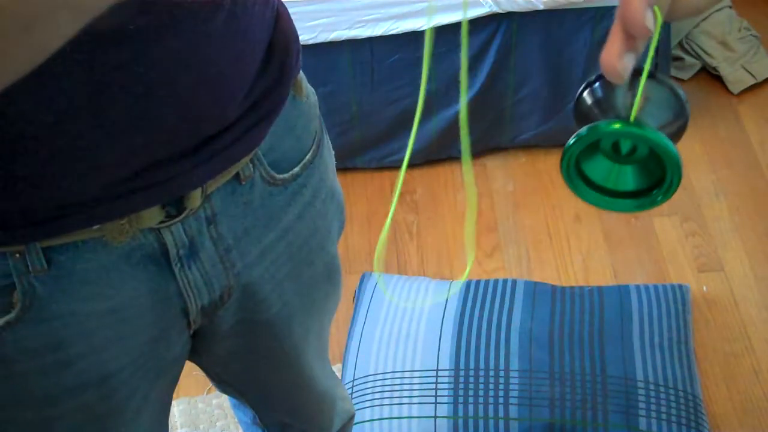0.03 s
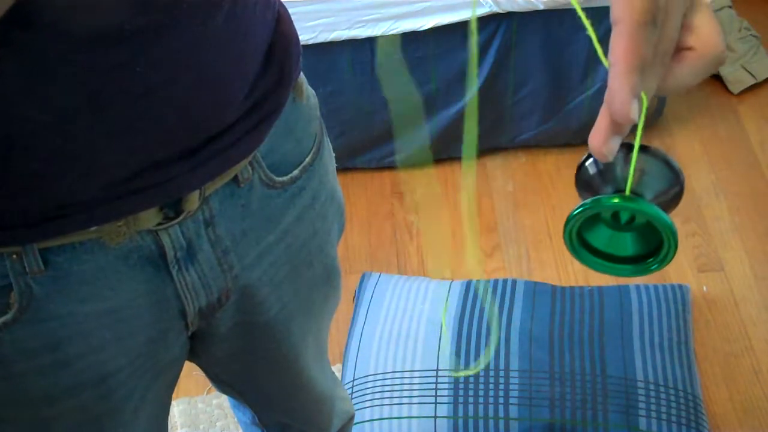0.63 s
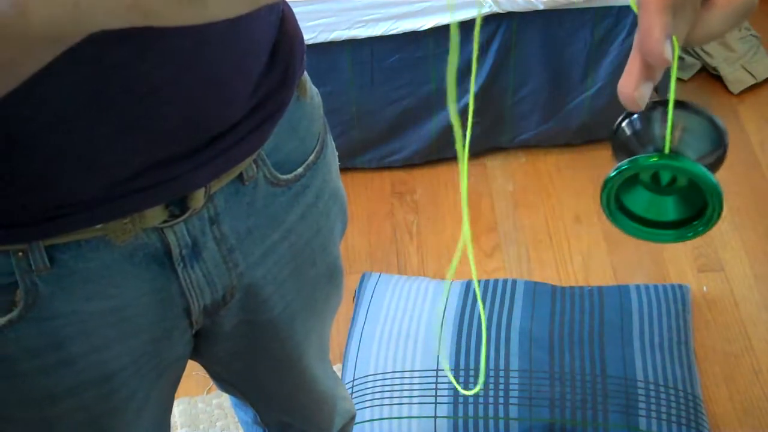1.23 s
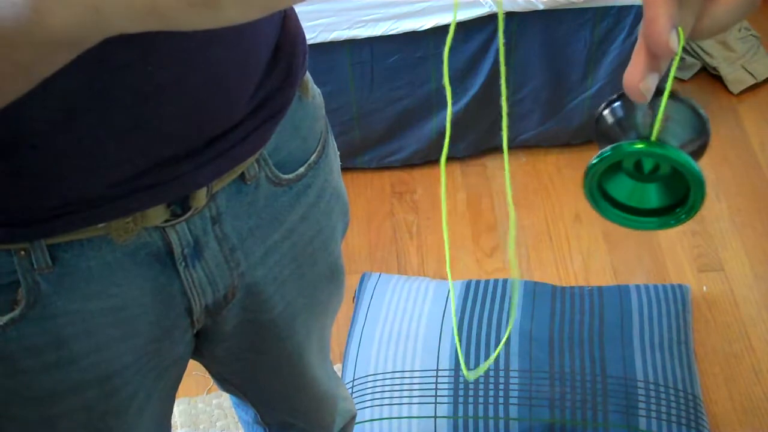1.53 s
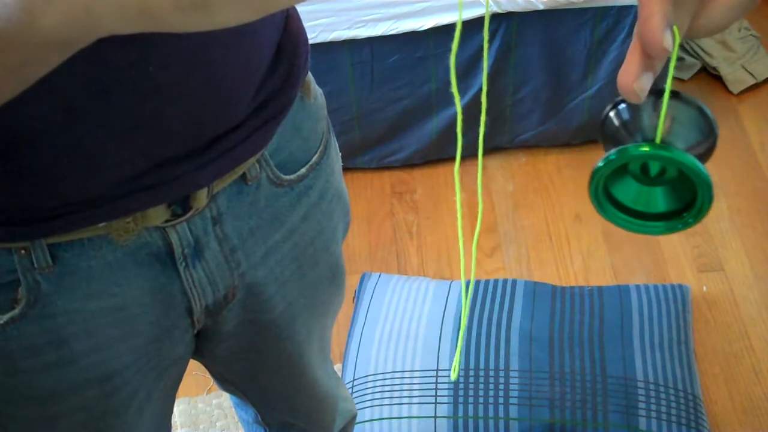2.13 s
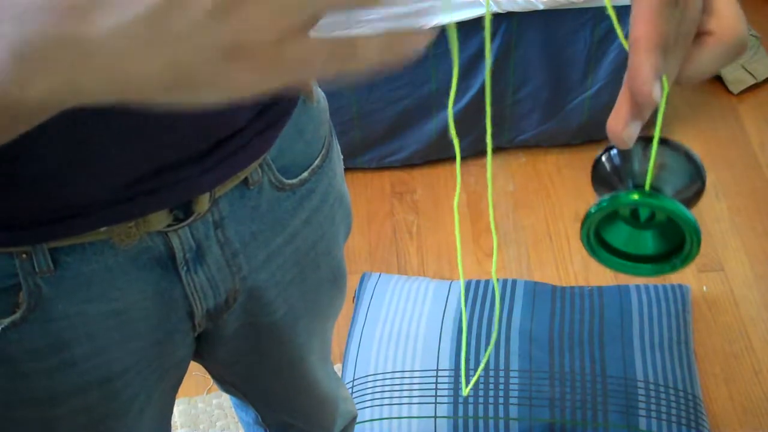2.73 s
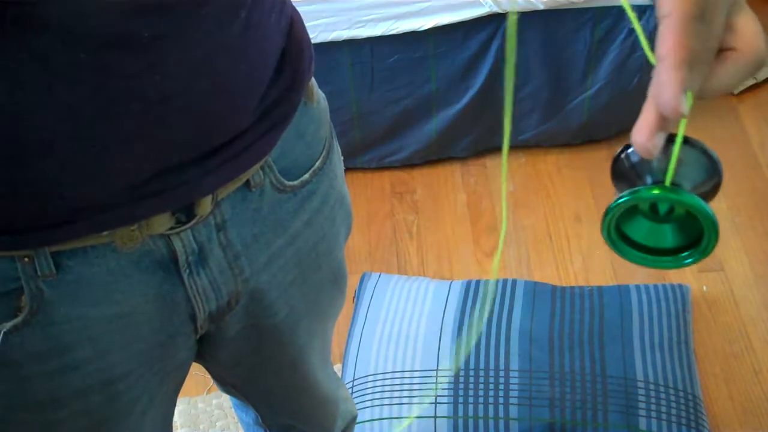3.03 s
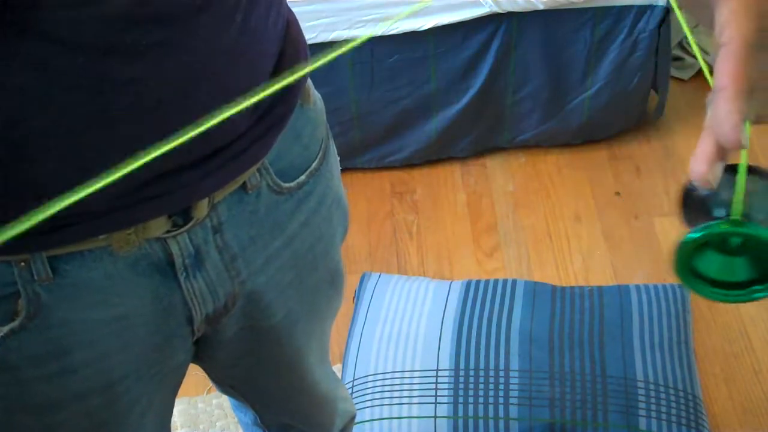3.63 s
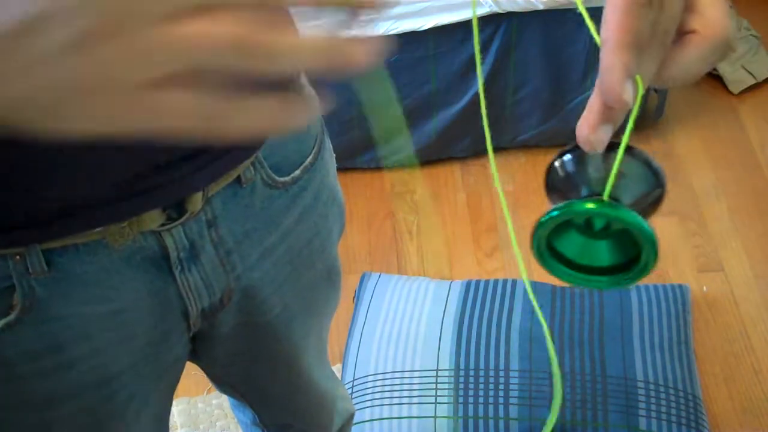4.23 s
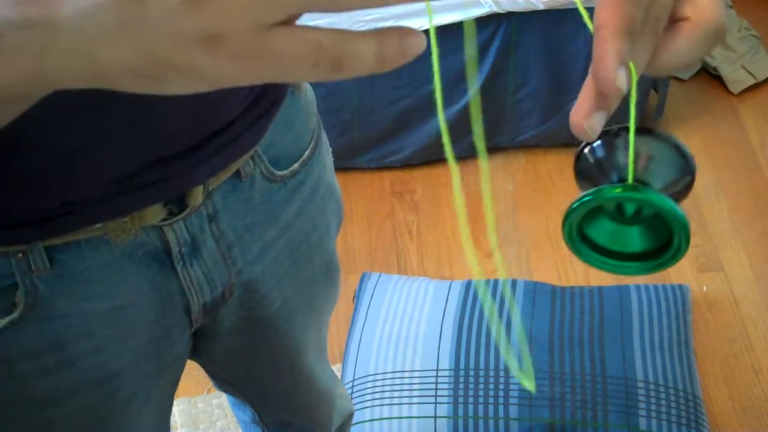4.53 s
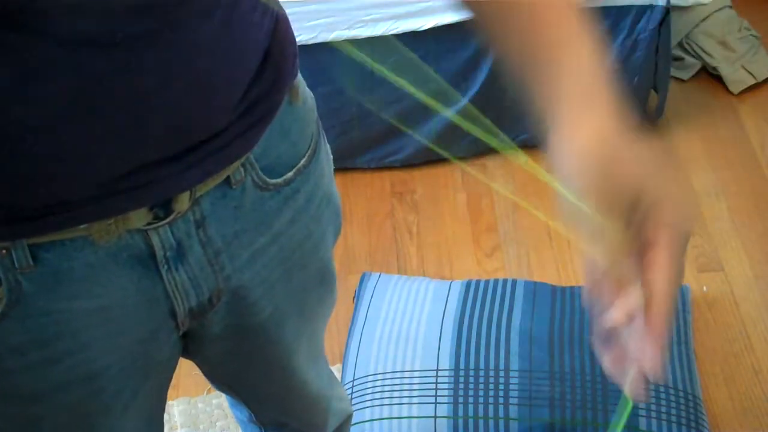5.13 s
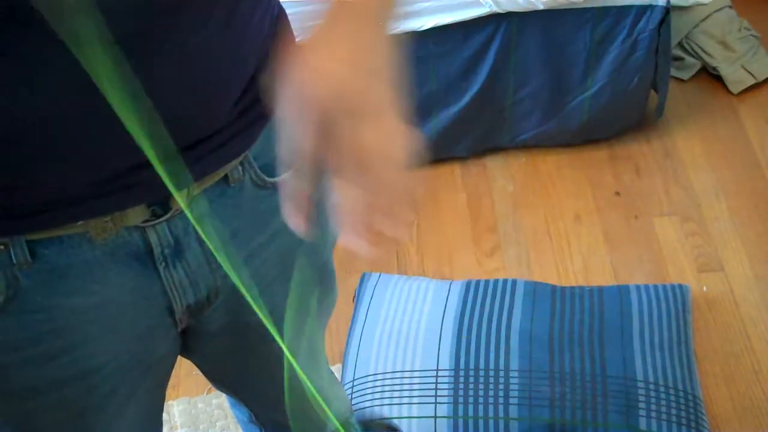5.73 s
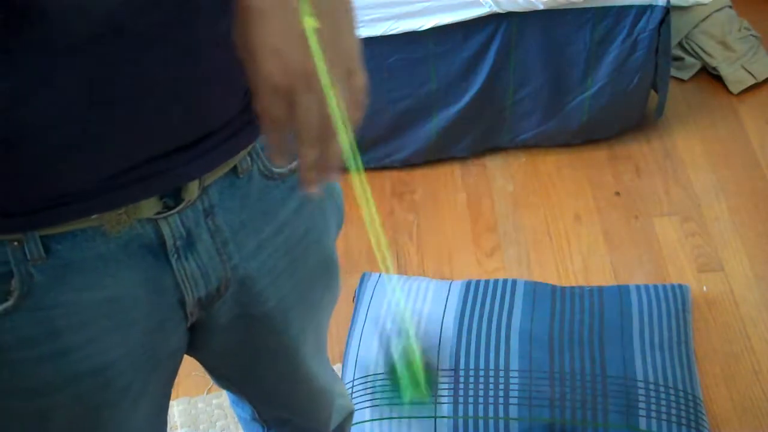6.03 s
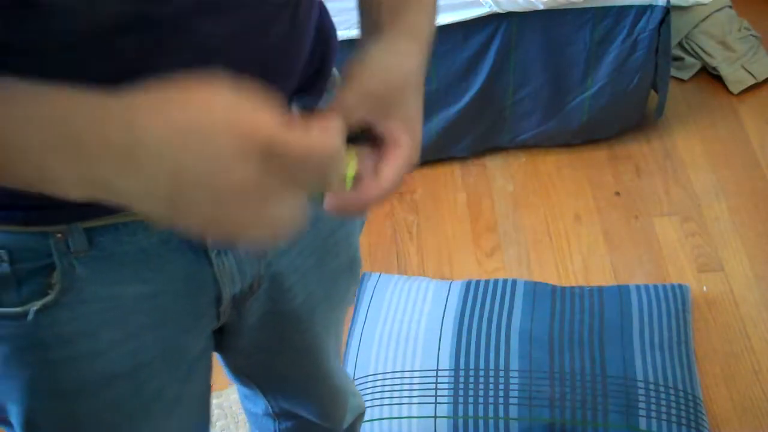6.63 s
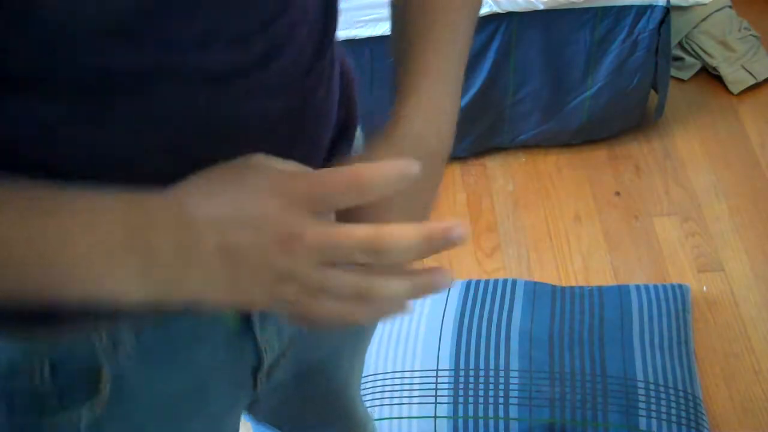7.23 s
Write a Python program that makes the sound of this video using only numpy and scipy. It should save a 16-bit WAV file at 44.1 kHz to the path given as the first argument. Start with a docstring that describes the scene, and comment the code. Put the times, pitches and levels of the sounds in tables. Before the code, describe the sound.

The high, gritty whir of a spinning metal yo-yo ends in a few bright clicks and one sharp catch in a small room.

```python
"""A metal yo-yo, spun and caught

A yo-yo spins on its string in a small furnished room. Impacts in the ball bearing rattle and keep the
modes of the two halves singing, while the string hisses by friction. The string binds, the yo-yo climbs
with ringing clicks and snaps into the hand, and the fingers rustle as they turn it over.
Two small microphone ports, each with its own treble resonance, pick it up."""
import sys
import numpy as np
from scipy import signal
from scipy.fft import rfft, irfft
from scipy.io import wavfile

SR = 44100
rng = np.random.default_rng(int(sys.argv[2]) if len(sys.argv) > 2 else 0)


def dump_mix(stems):
    """Bounce the given channels to the path in sys.argv[1] as a 16-bit WAV at rate SR."""
    frames = np.atleast_2d(stems).T  # one column per channel
    limited = np.clip(frames, -1, 1)  # hard clip at full scale
    pcm = np.round(limited * 32767).astype(np.int16)
    wavfile.write(sys.argv[1], SR, pcm)


N = 321930
TIME, FREQS_HZ = np.arange(N) / SR, np.fft.rfftfreq(N, 1 / SR)
BIND_S, CATCH_S, STOP_S = 5.7929, 6.19, 0.064  # the string binds; the hand catches; time taken to stop

def from_db(db):
    """Decibels to amplitude ratio."""
    return 10 ** (np.asarray(db) / 20)

def unit(x):
    """Normalisation to rms 1."""
    return x / np.sqrt(np.mean(x ** 2) + 1e-20)

def at_hz(points, hz):
    """Interpolation on a log-frequency axis."""
    f, value = np.transpose(points)
    return np.interp(np.log(hz + 1), np.log(f + 1), value)

def add(mix, s, sound):
    """Superposition of a sound starting at s seconds."""
    part = mix[..., max(round(s * SR), 0):][..., :sound.shape[-1]]
    part += sound[..., :part.shape[-1]]

def impulses(rows):
    """One impulse for each row of time and level."""
    out = np.zeros(N)
    for s, db, *_ in rows:
        add(out, s, from_db([db]))
    return out

def swells(rows):
    """One Gaussian envelope for each row of time, level and half length."""
    return sum(from_db(db) * np.exp(-.5 * np.minimum(((TIME - s) / length) ** 2, 100))
               for s, db, length in rows)

def convolve(x, response):
    """Convolution of one or two channels with one or two impulse responses."""
    return signal.oaconvolve(np.atleast_2d(x), np.atleast_2d(response), axes=1)[:, :N]

def colour(x, points, size=2048):
    """Minimum-phase filtering to a given spectrum."""
    log_gain = np.log(from_db(at_hz(points, abs(np.fft.fftfreq(size, 1 / SR)))))
    response = np.fft.ifft(np.exp(np.conj(signal.hilbert(log_gain)))).real
    return convolve(x, response[:size // 2])

def cut(x, order, hz, kind):
    """Maximally flat low-pass or high-pass filtering."""
    return signal.sosfilt(signal.butter(order, hz, kind, fs=SR, output="sos"), x)

def noise_pair(correlation, size=N):
    """Partly correlated white noise, left and right."""
    a, b = rng.standard_normal((2, size))
    return np.array([a, correlation * a + np.sqrt(1 - correlation ** 2) * b])

def drift(rate_hz):
    """Low-pass random modulation of rms 1."""
    return unit(irfft(rfft(rng.standard_normal(N)) * np.exp(-(FREQS_HZ / rate_hz) ** 2), N))

def decay(t, t60):
    """Exponential damping from t = 0, by 60 dB in t60 seconds."""
    return from_db(-60 * np.maximum(t, 0) / t60)

def ring(hz, t60, size=16384):
    """Free vibration of one damped mode."""
    t = np.arange(size) / SR
    return decay(t, t60) * np.sin(2 * np.pi * hz * t)

def scatter(t60, correlation, size=1024):
    """Multipath scattering of one contact: dying noise of energy 1 a side."""
    burst = noise_pair(correlation, size) * decay(np.arange(size) / SR, t60)
    return burst / np.linalg.norm(burst, axis=1, keepdims=True)

def bursts(force, t60, correlation):
    """Incoherent addition: each impulse contributes noise whose energy decays exponentially."""
    retained = np.exp(-2 * np.log(1000) / (t60 * SR))
    energy = signal.lfilter([1 - retained], [1, -retained], force ** 2 + 1e-20)
    return np.sqrt(energy) * noise_pair(correlation)

def clatter(force, length_s, correlation):
    """Clustered impacts: the energy of each impulse is spread over a short window of noise."""
    window = np.hanning(round(length_s * SR))
    energy = abs(convolve(force ** 2, window / window.sum()))
    return np.sqrt(energy) * noise_pair(correlation)

def spinning(climb_db_per_s=-15):
    """Loss of rotation: a gain that is steady, dies away in the climb and is stopped by the hand."""
    slowing = from_db(climb_db_per_s * np.maximum(TIME - BIND_S, 0))
    return slowing * np.clip(1 - (TIME - CATCH_S) / STOP_S, 0, 1)

# Strength of the rattle. Each row: time in seconds, level in dB.
RATTLE_LEVELS = [(0.0, -40.5), (0.06, -41.5), (0.72, -44.5), (0.77, -42.5), (1.26, -45), (1.54, -41.5),
                 (2.04, -45.5), (2.68, -43), (2.76, -41.5), (3.75, -45), (4.06, -42), (4.75, -43),
                 (4.8, -53.5), (4.92, -43.5), (5.09, -47), (5.1, -54.5), (5.15, -45), (5.23, -50.5),
                 (5.49, -43.5), (5.5, -48.5), (5.65, -47.5), (5.78, -56.5)]
def rattling():
    """Bearing load sets the rattle's gain: it drops on a slack string and ends when the string binds."""
    return from_db(np.interp(TIME, *np.transpose(RATTLE_LEVELS))) * np.clip(1 - (TIME - BIND_S) / STOP_S, 0, 1)

# Share of coarse chatter, strong after the throw and as the hand steadies the string.
# Each row: time in seconds, gain in dB.
CHATTER_SHARE = [(0.22, 2.5), (0.55, -2.5), (2.4, -2.5), (3.7, 4), (4.3, -2.5), (4.4, 0), (4.7, 2.5),
                 (4.95, 0.5)]
# Spectra of the fine rattle and the lower-pitched chatter. Each row: frequency in Hz, gain in dB.
RATTLE_SPECTRUM = [(300, -44.5), (1500, -19.5), (3600, -11.5), (5000, -4), (6000, -5.5), (7200, -1),
                   (8100, -0.5), (8350, -7.5), (10500, -28.5), (14000, -30.5)]
CHATTER_SPECTRUM = [(300, -65), (3200, -26), (4600, -15), (5900, -3), (7000, -8), (8000, -10.5),
                    (8800, -26), (10500, -14.5), (14000, -21)]
def bearing(impacts_per_s=1100, spin_hz=60.66, sag_hz_per_s=0.7, fine_db=-1.3, chatter_db=-2):
    """Impact noise: balls rattle in their race, and rotating unbalance throws them at each side in turn."""
    spurts = rattling() * from_db(fine_db + 2.2 * drift(35))
    sizes = from_db(1.5 * np.minimum(rng.exponential(1, N), 4))
    impacts = unit((rng.random(N) < impacts_per_s / SR) * sizes) * spurts
    turns_per_s = (spin_hz - sag_hz_per_s * TIME) * (1 + .05 * drift(40))
    half_turns = np.floor(2 * np.cumsum(turns_per_s) / SR)
    throw_db = 4 * np.clip(rng.standard_normal(N), -2, .5) - 6 * (half_turns % 2)  # far side is weaker
    throw_gain = rattling() * from_db(chatter_db + np.interp(TIME, *np.transpose(CHATTER_SHARE)))
    throws = unit(np.diff(half_turns, prepend=0) * from_db(throw_db)) * throw_gain
    rim_pings = from_db(-50) * convolve(throws, ring(hz=4500, t60=.09))
    rattle = colour(bursts(impacts, t60=.004, correlation=.75), RATTLE_SPECTRUM)
    chatter = colour(clatter(throws, length_s=.0017, correlation=.92), CHATTER_SPECTRUM)
    return rattle + chatter + rim_pings

# The string leans on the wall of the gap. Each row: centre time in seconds, hiss level in dB,
# drive to the rim in dB, half length in seconds.
STRING_RUBS = [(0.862, -77, -57, 0.061), (1.388, -67, -60.5, 0.07), (2.85, -61, -56, 0.025),
               (3.417, -66, -70, 0.34), (4.224, -61.5, -67, 0.064), (4.754, -71, -54, 0.014),
               (5.108, -73, -57.5, 0.032), (5.393, -55.5, -49.5, 0.012), (5.43, -59, -58, 0.01),
               (5.57, -73, -56, 0.062), (5.763, -87, -53.5, 0.012), (6.008, -89, -56, 0.045),
               (6.552, -77, -59, 0.016)]
def contact(touch_db=-67):
    """Sliding contact: the gain of the string's light touch during the spin, plus its harder rubs."""
    rubs = swells([(s, hiss_db, length) for s, hiss_db, _, length in STRING_RUBS])
    return from_db(touch_db) * spinning() + rubs

# String, skin and cloth rustle. Each row: centre time in seconds, level in dB, half length in seconds.
HAND_RUSTLES = [(5.877, -54, 0.043), (6.205, -46.5, 0.017), (6.568, -56, 0.017), (6.787, -59.5, 0.055),
                (6.933, -60, 0.051), (7.116, -60, 0.045), (7.222, -64, 0.051)]
# Spectra of the three friction noises. Each row: frequency in Hz, relative level in dB.
HISS_SPECTRUM = [(100, -13), (500, -10), (1200, -4), (2400, 2.5), (4000, -0.5), (6000, -6.5), (8000, 2.5),
                 (12000, -22.5)]
FIZZ_SPECTRUM = [(2000, -49), (6000, 3), (11000, -1.5), (14000, -3)]
RUSTLE_SPECTRUM = [(200, -9), (600, -3), (2400, 2.5), (5000, 1.5), (7000, 3), (8500, -5), (13000, -13)]
def rubbing(grain_db=2.0, bearing_fizz_db=-18):
    """Friction noise: fibres catch and slip in a hiss, a fizz following bearing and string, and rustles."""
    grain = from_db(grain_db * drift(170))
    hiss = unit(colour(grain * noise_pair(0.98), HISS_SPECTRUM)) * contact()
    surge = from_db(2 * drift(20)) * np.hypot(from_db(bearing_fizz_db) * rattling(), contact())
    fizz = unit(colour(grain * noise_pair(0.095), FIZZ_SPECTRUM)) * surge
    rustle = unit(colour(grain * noise_pair(0.68), RUSTLE_SPECTRUM)) * swells(HAND_RUSTLES)
    return hiss + fizz + rustle

# Modes of the lower half, higher half, rim and bearing. Each row: frequency in Hz, coupling in dB.
DRIVEN_MODES = [(1489, -4.5), (1594, -1), (4500, -2.5), (8090, -21)]
# The linewidth of each of these modes in Hz.
LINEWIDTHS_HZ = [13, 7, 24, 130]
# The lower half swells mostly as the string swings, the higher half now and then.
# Each row: centre time in seconds, drive in dB, half length in seconds.
LOW_HALF_SWELLS = [(3.27, -63, 0.017), (3.47, -65, 0.17), (4.22, -63.5, .1), (4.71, -68, 0.039),
                   (4.99, -65, 0.021), (5.72, -60, 0.025), (5.98, -63.5, 0.088)]
HIGH_HALF_SWELLS = [(.11, -57, 0.022), (.26, -62, 0.04), (.69, -70.5, 0.046), (1.55, -73.5, 0.55),
                    (2.72, -62.5, 0.093), (3.86, -62, 0.02), (4.003, -59, 0.044), (4.665, -61, 0.025),
                    (5.42, -64, 0.028)]
def singing(hum_db=-70.5, waver_db=4.5, climb_hz_per_s=140):
    """Forced resonance: spin, string and rattle feed lightly damped modes; phase and strength wander."""
    out, hum = np.zeros(N), from_db(hum_db) * spinning()
    bowing = swells([(s, rim_db, length) for s, _, rim_db, length in STRING_RUBS])
    drives = [(hum, swells(LOW_HALF_SWELLS)), (hum, swells(HIGH_HALF_SWELLS)),
              (hum, bowing), (rattling(), 0)]
    # The lower half's note rises as the climb slows the spin.
    glides = [climb_hz_per_s * np.clip(TIME - BIND_S, 0, CATCH_S - BIND_S), 0, 0, 0]
    for (steady, swell), glide, (hz, db), width in zip(drives, glides, DRIVEN_MODES, LINEWIDTHS_HZ):
        wander = np.cumsum(rng.standard_normal(N)) * np.sqrt(np.pi * width / SR)
        phasor = cut(np.exp(1j * wander), 2, 70, "low")
        carrier = np.exp(2j * np.pi * np.cumsum(np.full(N, hz) + glide) / SR)
        tone = unit((phasor * carrier).real)
        flutter = unit(from_db(waver_db * drift(22)))
        out += tone * (steady * flutter + swell * np.sqrt(flutter)) * from_db(db)
    return out

# The background's spectrum, and its excess on the left. Each row: frequency in Hz, relative level in dB.
BACKGROUND_SPECTRUM = [(15, -46), (25, -10.5), (231, -10.5), (1050, -10), (14000, -19.5)]
LEFT_EXCESS = [(60, -1.5), (250, 5), (700, 6.5), (2500, 0), (6000, 4), (14000, 0)]
def room_tone(level_db=-61):
    """Stationary noise: a faint hiss, uncorrelated between the sides."""
    shape_db = at_hz(BACKGROUND_SPECTRUM, FREQS_HZ) + np.outer([.5, -.5], at_hz(LEFT_EXCESS, FREQS_HZ))
    return from_db(level_db) * unit(irfft(rfft(rng.standard_normal((2, N))) * from_db(shape_db), N))

# The hardest knocks of the balls in their race, and two bright string ticks (the 13000 Hz rows). # Each row:
# centre time in seconds, level in dB, pitch in Hz, half length in seconds.
KNOCKS_AND_TICKS = [(.0343, -31, 5800, .00025), (.0742, -37, 7200, .0004), (.0776, -33, 7000, .0005),
                    (1.9605, -37, 13000, .00015), (2.274, -38, 7600, .0005), (2.5604, -36, 7300, .0004),
                    (2.6037, -29, 6400, .0002), (2.6202, -35, 6600, .00025), (2.7332, -35, 7000, .0004),
                    (2.8761, -35, 7700, .0004), (2.9354, -30.5, 6000, .0003), (3.2245, -38, 7000, .0005),
                    (3.4657, -32, 6100, .00025), (3.5401, -34, 6700, .0003), (4.0814, -36, 7400, .0005),
                    (4.151, -35.5, 13000, .00015), (4.3612, -37, 7500, .0008), (4.3956, -37, 7400, .0006),
                    (4.6082, -37.5, 7500, .0005), (4.836, -41, 6600, .00025), (5.4662, -38, 7700, .0004),
                    (5.4812, -36, 6800, .0004)]
def knocks(tick_db=-2):
    """Impact transients: a few cycles of ringing under a thin tick; a glancing knock lasts longer."""
    out, t = from_db(tick_db) * impulses(KNOCKS_AND_TICKS), np.arange(-200, 200) / SR
    for s, db, hz, length in KNOCKS_AND_TICKS:
        envelope = from_db(db) * np.exp(-.5 * (t / length) ** 2)
        add(out, s + t[0], envelope * np.sin(2 * np.pi * hz * t))
    return out

# The string scrapes inside the gap. Each row: centre time in seconds, level in dB, half length in seconds.
STRING_SCRAPES = [(0.052, -48.5, 0.03), (0.795, -51, 0.018), (4.935, -54, 0.073)]
def scrapes(hz=5200, width_hz=700):
    """Stick-slip friction: the sliding string stutters on the metal in a narrow, gritty rasp."""
    band = np.exp(-.5 * ((FREQS_HZ - hz) / width_hz) ** 2)
    grit = noise_pair(1.0) * from_db(5.3 * drift(240))
    return swells(STRING_SCRAPES) * unit(irfft(rfft(grit) * band, N))

# Soft pushes of air. Each row: peak time in seconds, level in dB, rise and t60 in seconds, centre in Hz.
AIR_PUFFS = [(5.089, -57.5, 0.006, 0.25, 636), (5.79, -61.5, 0.0099, 0.17, 696),
             (5.864, -60.5, 0.02, 0.45, 614), (6.186, -51, 0.0008, 0.12, 393),
             (6.732, -52, 0.0017, 0.28, 265), (6.915, -61, 0.018, 0.25, 483)]
def puffs(width_octaves=0.97):
    """Air displacement: string loops and hands make dull bursts of noise that swell and die away."""
    out, octaves = np.zeros((2, N)), np.log2(np.fft.rfftfreq(SR, 1 / SR) + 1)
    t = np.arange(SR) / SR - .1
    for s, db, rise, t60, hz in AIR_PUFFS:
        band = np.exp(-.5 * ((octaves - np.log2(hz)) / width_octaves) ** 2)
        air = unit(irfft(rfft(noise_pair(0.8, SR)) * band))
        envelope = np.exp(-(np.minimum(t, 0) / rise) ** 2) * decay(t, t60)
        add(out, s + t[0], from_db(db) * envelope * air)
    return out

# The string flicks a rim. Each row: start in seconds, relative level in dB.
STRING_FLICKS = [(5.746, -28), (5.862, -27), (5.8655, -24), (6.088, -33.5), (6.104, -35)]
# Blows on the halves. Each row: start in seconds, then relative levels in dB of the click
# and of the low, middle and high modes.
METAL_BLOWS = [(5.7853, -20, -57, -41, -58), (5.7925, -21, -57, -54, -39), (5.965, -18.5, -52, -47.5, -63),
               (6.0277, -21, -57, -68, -54), (6.1723, -39, -52, -53, -42), (6.4115, -42, -85, -72, -68),
               (6.568, -24, -67, -57, -37.5), (6.612, -23.5, -59, -55, -47)]
# Modes of a struck half. Each row: frequency in Hz, t60 in seconds, coupling in dB,
# then the offset in Hz of the other half's twin mode while spinning and once held.
HALF_MODES = [(1590, .17, -1, -60, -45), (4497, .16, -1, 27, 10), (7070, .13, -8, -100, 55)]
# Spectrum of a click. Each row: frequency in Hz, gain in dB.
CLICK_SPECTRUM = [(150, -42), (700, -4.5), (3000, 1), (5000, 2.5), (7000, 10), (9000, -5), (14500, -19)]
def blows(click_db=-3, scatter_db=-2, twin_db=-6):
    """Impulse excitation: every contact clicks; blows also ring the halves, whose detuned modes beat."""
    clicks = impulses(METAL_BLOWS) * from_db(click_db)
    scattered = from_db(scatter_db) * convolve(clicks, scatter(t60=.02, correlation=.6))
    flicks = cut(impulses(STRING_FLICKS), 2, 6000, "high")
    out = colour(clicks + flicks + scattered, CLICK_SPECTRUM)
    for s, _, *ring_db in METAL_BLOWS:
        for strength_db, (hz, t60, db, spun_hz, held_hz) in zip(ring_db, HALF_MODES):
            twin = from_db(twin_db) * ring(hz + (spun_hz if s < CATCH_S else held_hz), t60)
            add(out, s, from_db(strength_db + db) * (ring(hz, t60) + twin))
    return out

def squeal(level_db=-30, hold_s=0.015, t60=0.038):
    """Friction-driven vibration: the binding string bows the rim for an instant, then damps it."""
    out, t = np.zeros(N), np.arange(SR) / SR
    rim_hz = HALF_MODES[1][0]
    add(out, BIND_S, decay(t - hold_s, t60) * np.sin(2 * np.pi * rim_hz * t))
    return from_db(level_db) * out

# The catch, with run-up and rebound. Each row: start in seconds, relative crack and knock levels in dB.
CATCH_HITS = [(6.1827, -27, -20), (6.1848, -6, -5.5), (6.186, -32, -32), (6.194, -20, -11)]
# Modes of the whole body against the hand. Each row: frequency in Hz, coupling in dB.
HELD_MODES = [(180, -39), (1100, -29.5), (2150, -29.5), (2460, -25)]
# Spectrum of the crack. Each row: frequency in Hz, gain in dB.
CRACK_SPECTRUM = [(200, -69), (1000, -2), (2400, 7.5), (4800, -0.5), (6300, 14.5), (7200, 17), (8000, 2),
                  (9300, -0.5), (10500, -8), (14500, -13)]
def snap(crack_db=-2, scatter_db=-5):
    """Damped impact: the yo-yo hits the hand with a crack and a knock, with little bass."""
    hits = impulses(CATCH_HITS)
    scattered = from_db(scatter_db) * convolve(hits, scatter(t60=.02, correlation=.7))
    crack = from_db(crack_db) * colour(hits + scattered, CRACK_SPECTRUM)
    body = sum(from_db(db) * ring(hz, t60=.02) for hz, db in HELD_MODES)
    knock = convolve(impulses([(s, db) for s, _, db in CATCH_HITS]), body)
    return cut(crack + knock, 4, 140, "high")

# Reverberation time. Each row: frequency in Hz, t60 in seconds.
ROOM_T60 = [(200, 0.052), (2000, 0.36), (6000, 0.32), (8000, 0.32), (14000, 0.022)]
def room(x, size=16384):
    """Reverberation: dense reflections from floor, bed and walls; bass and top treble die first."""
    hz, t, spectra = signal.stft(rng.standard_normal((2, size)), SR, nperseg=256)
    tail = signal.istft(spectra * decay(t, at_hz(ROOM_T60, hz)[:, None]), SR, nperseg=256)[1]
    tail *= np.clip(np.arange(tail.shape[1]) / SR / 0.003 - 1, 0, 1)  # reflections begin after 3 ms
    return convolve(x, tail / np.linalg.norm(tail, axis=1, keepdims=True))

def swaying_room(x, sway_s=.8):
    """A moving source: as the yo-yo sways, one set of reflection paths fades into the next."""
    shares = (np.clip(1 - abs(TIME - s) / sway_s, 0, 1) for s in np.arange(0, CATCH_S, sway_s))
    return sum(room(x * np.sqrt(share)) for share in shares)

def from_the_right(x, lag_s=.00005):
    """Path difference: sound from the right reaches the left port later."""
    late = irfft(rfft(x[0]) * np.exp(-2j * np.pi * FREQS_HZ * lag_s), N)
    return np.array([late, x[1]])

def scene(rattle_wet_db=-10, blow_wet_db=-11, catch_wet_db=-19):
    """Direct plus reflected sound: spin on the right, catch in the middle, its echo muffled by the hand."""
    rattle, hits, catch = bearing() + knocks(), blows() + squeal(), snap()
    reverb = swaying_room(from_db(rattle_wet_db) * rattle)
    reverb += room(from_db(blow_wet_db) * hits + from_db(catch_wet_db) * catch)
    spin = from_the_right(rattle + singing() + scrapes())
    return spin + rubbing() + hits + catch + puffs() + reverb

# Responses of the two microphone ports. Each row: frequency in Hz, gain in dB.
LEFT_RESPONSE = [(3500, 1), (5000, 2), (6200, 1), (7000, 12.5), (7700, 16), (9000, 13), (11000, 6),
                 (14000, 8.5)]
RIGHT_RESPONSE = [(3500, 1), (5000, 4), (6100, 11.5), (7000, 7.5), (7700, 3.5), (9000, 4.5), (11000, -3),
                  (14000, -2)]
def record(dry, cutoff_hz=14300):
    """Port resonance colours each side; the steady hiss is added and the whole is band-limited."""
    heard = np.vstack([colour(dry[0], LEFT_RESPONSE), colour(dry[1], RIGHT_RESPONSE)]) + room_tone()
    low_pass = signal.firwin(401, cutoff_hz, window=("kaiser", 8), fs=SR)
    return signal.oaconvolve(heard, low_pass[None], "same", axes=1)

dry = scene()
out = record(dry)
dump_mix(out)
```